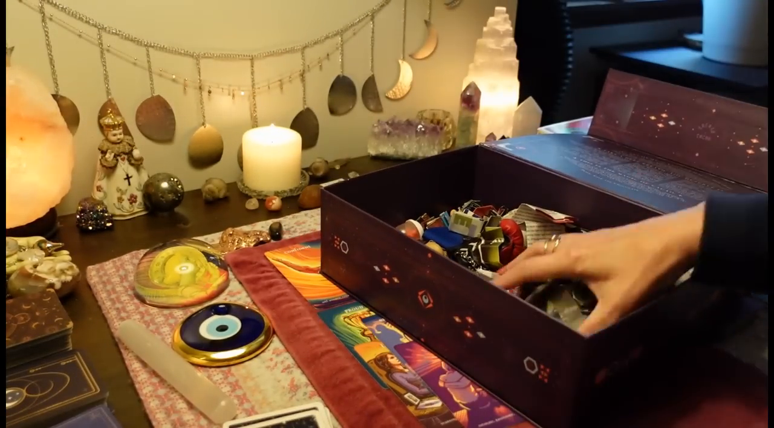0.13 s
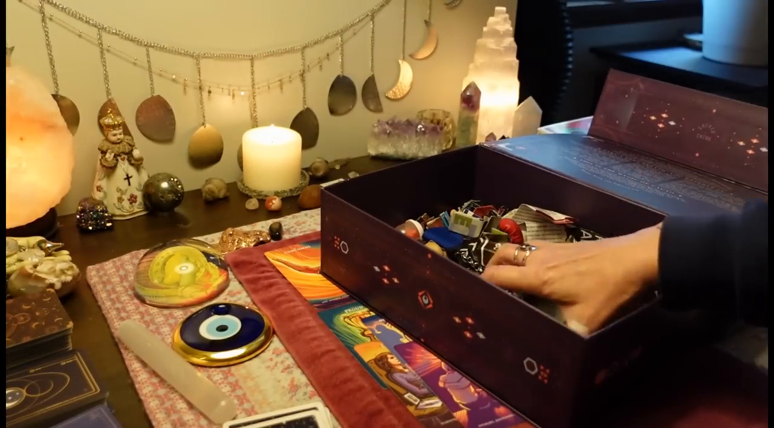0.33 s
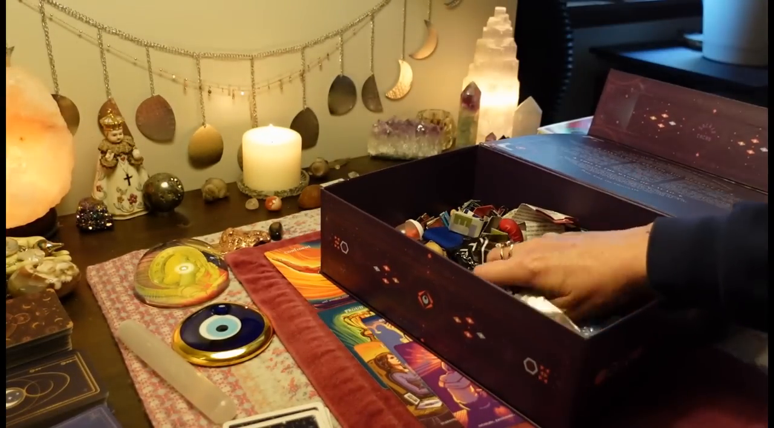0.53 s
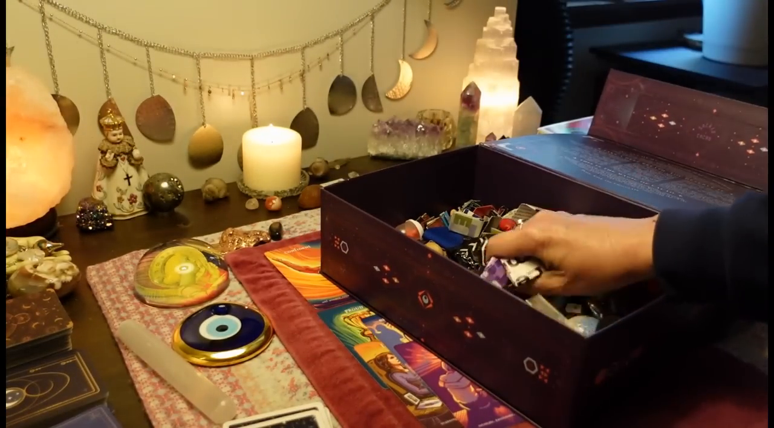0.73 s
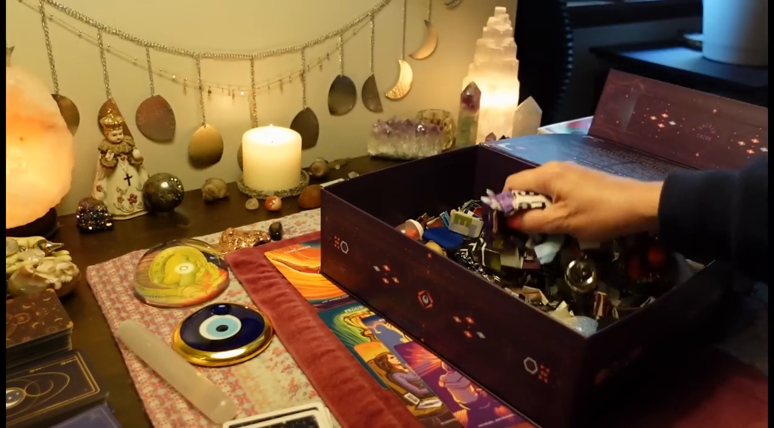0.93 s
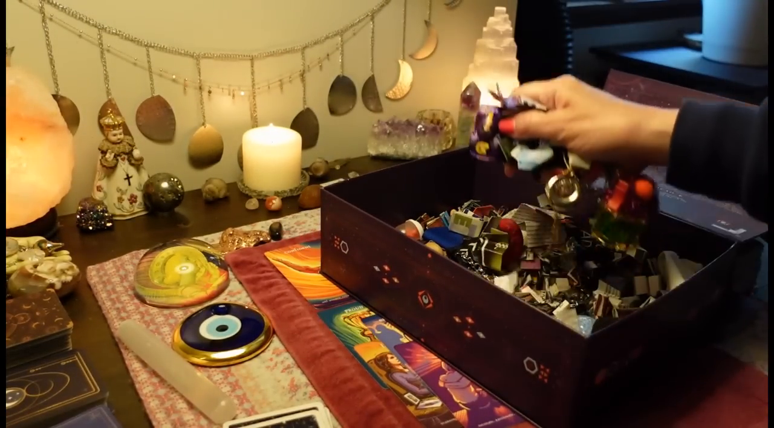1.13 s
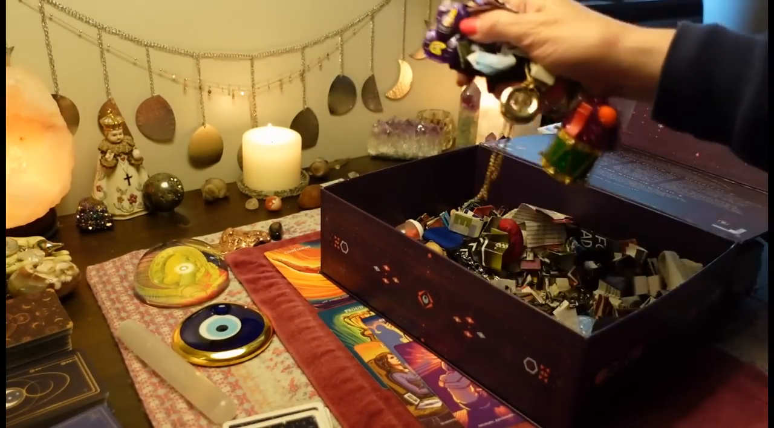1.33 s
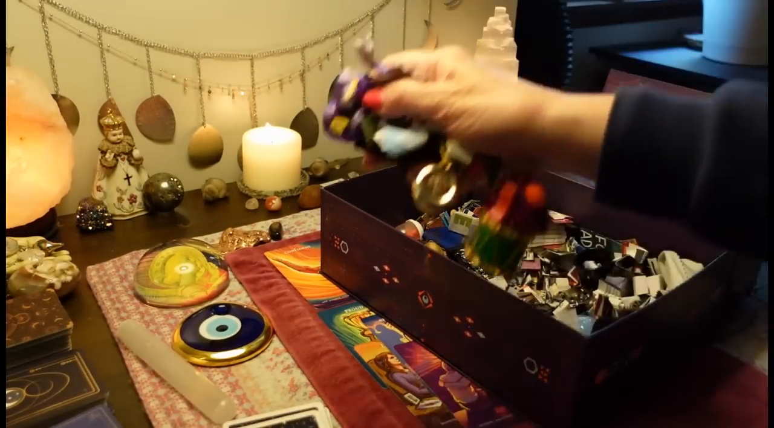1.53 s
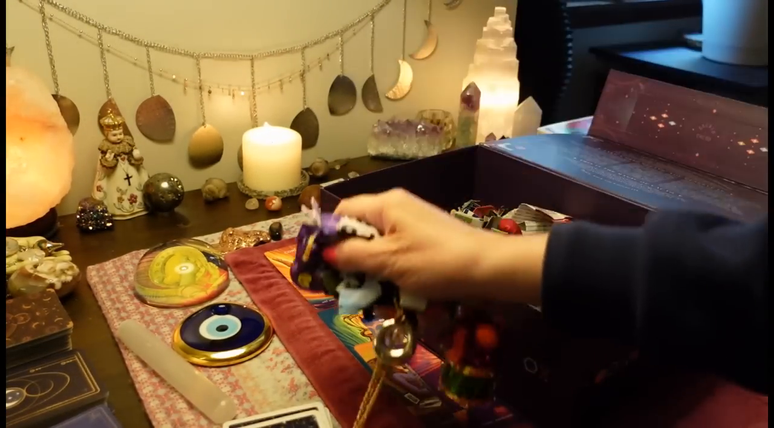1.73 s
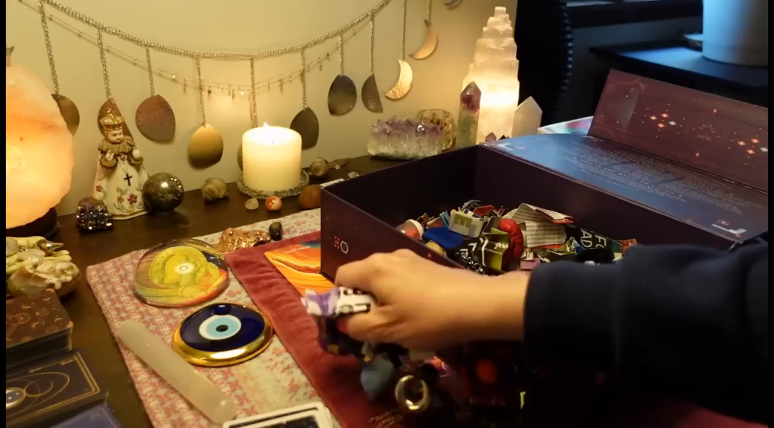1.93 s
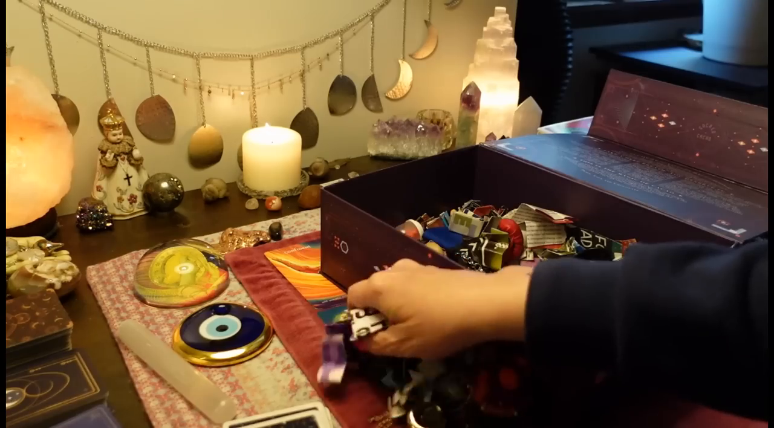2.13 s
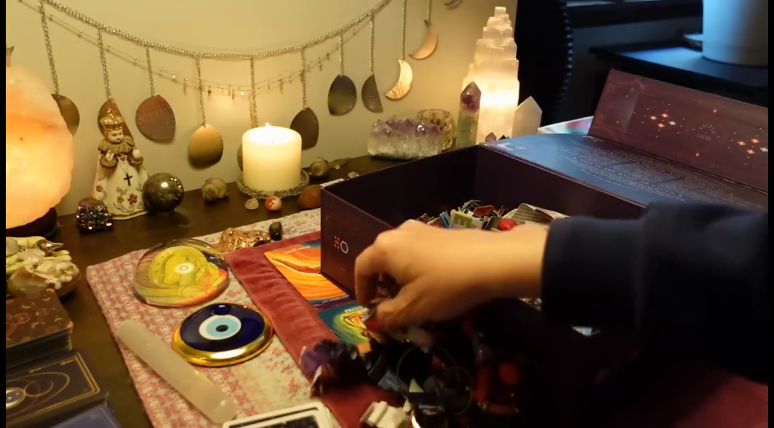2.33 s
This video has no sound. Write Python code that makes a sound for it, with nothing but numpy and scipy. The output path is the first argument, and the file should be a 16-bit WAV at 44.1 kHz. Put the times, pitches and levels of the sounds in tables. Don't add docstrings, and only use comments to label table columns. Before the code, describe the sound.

Dense clinking and rattling of small charms with dull box knocks, thinning to faint ticks as a fistful is lifted, then clacks on a cloth-covered table and one loud heavy crack, heard close indoors.

```python
import sys
import numpy as np
from scipy import signal
from scipy.fft import rfft, irfft, next_fast_len
from scipy.io import wavfile
from scipy.ndimage import uniform_filter1d

SR = 44100
rng = np.random.default_rng(int(sys.argv[2]) if len(sys.argv) > 2 else 0)


def boost_factor(decibels):
    exponent = np.asarray(decibels, float) / 20
    return 10 ** exponent


def pcm_store(signal):
    levels = np.round(np.clip(np.atleast_2d(signal), -1, 1) * 32767)
    wavfile.write(sys.argv[1], SR, levels.astype(np.int16).T)


N = 105310


def evened(x):
    return x / np.sqrt(np.mean(x ** 2) + 1e-20)


def read(points, hz):
    point_hz, value = np.transpose(points)
    return np.interp(np.log(hz + 1), np.log(point_hz + 1), value)


def shaped(x, points):
    hz = np.fft.rfftfreq(N, 1 / SR)
    return irfft(rfft(x) * boost_factor(read(points, hz)), N)


def add(mix, start_s, sound):
    part = mix[round(start_s * SR):][:len(sound)]
    part += sound[:len(part)]


def resonate(x, hz, width_hz):
    q = max(hz / width_hz, .3)
    return signal.lfilter(*signal.iirpeak(min(hz, .45 * SR), q, SR), x)


def ring(modes, soft_s=0.0017):
    t = np.arange(4000) / SR
    onset = 1 - np.exp(-t / soft_s)
    return onset * sum(boost_factor(db - 60 * t / t60) * np.sin(2 * np.pi * hz * t) for hz, db, t60 in modes)


def contacts(per_s, spread_db, clump_db, clump_s):
    width = int(clump_s * SR)
    clump = evened(uniform_filter1d(uniform_filter1d(rng.standard_normal(N), width), width))
    size = boost_factor(spread_db * np.minimum(rng.exponential(1, N), 4) + clump_db * clump)
    return size * rng.choice([-1., 1.], N) * (rng.random(N) < per_s / SR)


def stir(order):
    # start_s [s], rattle_db [dB], wall_push_db [dB]
    stirring = [(0.148, -67.5, -58), (0.175, -44.5, -46), (0.222, -44, -50.5), (0.264, -35.5, -37.5),
                (0.311, -34, -43.5), (0.369, -44.5, -50), (0.454, -28.5, -31.5), (0.534, -38.5, -43.5),
                (.65, -42, -47.5), (0.761, -50, -49.5), (.86, -48.5, -61), (.94, -54, -63.5),
                (1.05, -49, -65), (1.15, -64, -78), (1.92, -93, -79), (1.988, -51, -59), (2.132, -41, -50),
                (2.24, -52.5, -60)]
    rows = np.array(stirring)
    return boost_factor(np.interp(np.arange(N) / SR, rows[:, 0], rows[:, order], left=-90))


def hush():
    # hz [Hz], level_db [dB per Hz]
    spectrum = [(18, -59), (30, -25), (248, -9), (349, -9), (378, -13.5), (576, -11), (834, -14),
                (13700, -32.5), (16400, -30.5)]
    same = 0.48
    a, b = rng.standard_normal((2, N))
    pair = np.array([a, same * a + np.sqrt(1 - same ** 2) * b])
    return boost_factor(-60.5) * evened(shaped(pair, spectrum))


def room(x):
    # hz [Hz], t60_s [s]
    decay = [(200, 0.43), (1000, 0.47), (5000, 0.39), (15000, 0.18)]
    taps = np.zeros((3, SR // 2))
    at = np.arange(120, SR // 2 - 20, 20) + rng.integers(0, 20, (3, (SR // 2 - 121) // 20))
    np.put_along_axis(taps, at, rng.choice([-1., 1.], at.shape), 1)
    hz, t, z = signal.stft(taps[0] + 0.6 * taps[1:], SR, nperseg=256)
    tail = signal.istft(z * boost_factor(-60 * t / read(decay, hz)[:, None]), SR, nperseg=256)[1]
    return signal.fftconvolve(x[None], tail / np.linalg.norm(tail[0]), axes=1)[:, :N]


def thumps():
    # start_s [s], level_db [dB], pitch_hz [Hz]
    flexings = [
        (0.425, -34, 163),
        (.462, -31, 287),
        (0.539, -35.5, 136),
        (0.637, -41.5, 166),
        (0.714, -45, 150),
        (.735, -40.5, 278),
        (.72, -43, 414),
        (0.8, -42.5, 165),
        (2.124, -38.5, 181),
    ]
    out = np.zeros(N)
    for start_s, level_db, pitch_hz in flexings:
        add(out, start_s, boost_factor(level_db) * ring([(pitch_hz, 3, 0.097)], soft_s=0.0046))
    return out


def walls():
    # pitch_hz [Hz], width_hz [Hz], level_db [dB]
    panels = [(144.4, 53, -3), (189, 44, 0.5), (260.6, 18, 3), (398, 64, 6), (529, 101, 2.5), (772, 100, 2),
              (1220, 127, -7)]
    push = evened(contacts(1500, 2.85, 1.8, 0.002)) * stir(order=2)
    out = np.zeros(N)
    for k, (hz, width_hz, db) in enumerate(panels):
        out += (-1) ** k * boost_factor(db) * resonate(push, hz, width_hz)
    return boost_factor(16.5) * out


def knock(level_db, slap_db):
    # pitch_hz [Hz], level_db [dB], t60_s [s]
    hollow = [(541, 4.5, 0.045), (470, -10, 0.02), (628, -2, 0.024), (300, -15.5, 0.026),
              (163.3, -23.5, 0.049)]
    modes = [(hz * (1 + 0.053 * rng.uniform(-1.02, 1)), db, t60) for hz, db, t60 in hollow]
    slap = ring([(950, slap_db, .009)])
    return boost_factor(level_db) * (ring(modes, soft_s=0.0024) + boost_factor(15.5) * slap)


def knocks():
    # start_s [s], level_db [dB], slap_db [dB]
    blows = [(0.177, -32.5, -6), (0.247, -29.5, -9), (0.28, -27, 0), (0.325, -23.5, -7), (0.39, -27, -5),
             (0.425, -28, -4), (0.468, -34, 3), (0.481, -22.5, -9), (0.552, -28, -5), (0.631, -39, 3),
             (0.718, -31, -26), (0.733, -46, -37), (0.819, -39.5, -5), (1.9288, -30.5, -7),
             (1.979, -24.5, -8), (2.097, -48, 23), (2.124, -21.5, -7.5)]
    out = np.zeros(N)
    for start_s, level_db, slap_db in blows:
        add(out, start_s, knock(level_db, slap_db))
    return out


def rattle():
    # hz [Hz], level_db [dB per Hz]
    spectrum = [(410, -18.5), (700, -5), (1740, -9), (2300, -8.5), (8280, -7.5), (15000, -15), (15800, -6),
                (16400, -59)]
    hits, piece = contacts(5000, 3.0, 1.9, 0.0072), rng.integers(0, 10, N)
    ticks = 0.33 * hits
    for k, hz in enumerate(np.geomspace(1300, 14000, num=10)):
        ticks += resonate(hits * (piece == k), hz, 0.29 * hz) * np.sqrt(5000 / hz)
    dry_ticks = evened(shaped(ticks, [(200, -27)] + list(spectrum)))

    pitches_hz = np.geomspace(2100, 14800, num=28) * rng.uniform(.96, 1.04, size=28)
    few, which = contacts(1200, 1.4, 4.9, 0.022), rng.integers(0, len(pitches_hz), N)
    gain = stir(order=1)
    rung = np.zeros(N)
    for k, hz in enumerate(pitches_hz):
        rung += signal.oaconvolve(few * gain * (which == k), ring([(hz, 0, .022)]))[:N]
    return dry_ticks * gain + boost_factor(-8) * rung


def pendant():
    # pitch_hz [Hz], level_db [dB], t60_s [s]
    modes = [(840, -14, 0.023), (2380, -11.5, 0.016), (6230, -17, .015), (7430, -7, 0.019),
             (7920, -12, 0.029), (8300, -6, 0.035), (8230, -9.5, 0.034), (8680, -12, .02),
             (9100, -9, 0.018), (9800, -8.5, 0.017), (11100, -12, 0.014), (13500, -2, 0.0055),
             (14400, -5, .005)]
    # start_s [s], level_db [dB]
    swings = [(1.033, -43), (1.043, -35), (1.0463, -41), (1.0485, -36), (1.0502, -35), (1.055, -51),
              (1.0589, -35), (1.062, -42), (1.0655, -36), (1.0688, -33), (1.0721, -39.5), (1.075, -51),
              (1.08, -51), (1.1223, -49), (1.1255, -47)]
    out = np.zeros(N)
    for start_s, level_db in swings:
        spot = [(hz * (1 + 0.021 * rng.standard_normal()), db + 5.1 * rng.standard_normal(), t60)
                for hz, db, t60 in modes]
        add(out, start_s, boost_factor(level_db) * ring(spot, soft_s=.00005))
    return out


def clack(level_db, pitch_hz, chatter_s, ring_db, first, width_hz):
    sign, chance, ratio = rng.standard_normal(2000), rng.random(2000), rng.uniform(1.2, 1.87)
    u = np.arange(2000) / SR / max(chatter_s, .0003)
    hits = sign * (chance < .3) * np.minimum(u / 0.39, 1) * np.exp(-u)
    hits[0] = first
    middle_hz = pitch_hz ** .6 * 4500 ** 0.4
    broad = resonate(resonate(hits, middle_hz, 2.06 * middle_hz), middle_hz, 2.06 * middle_hz)
    tick = broad + boost_factor(-12.5) * np.diff(hits, prepend=0)
    overtone = resonate(hits, pitch_hz * ratio, 2 * width_hz)
    rung = resonate(hits, pitch_hz, width_hz) + boost_factor(-37.0) * overtone
    sound = tick + boost_factor(ring_db) * rung
    return boost_factor(level_db) * sound / abs(sound).max()


def clacks():
    # start_s [s], level_db [dB], pitch_hz [Hz], chatter_s [s]
    dig = [(0.0423, -49, 1320, 0.016), (0.1671, -33, 2260, 0.008), (0.179, -26.5, 4600, 0.0073),
           (0.2383, -32, 3130, 0.006), (.2463, -19, 7850, 0.0024), (0.2505, -16.5, 7960, 0.0063),
           (0.2535, -27, 6000, 0.0064), (0.2787, -15.5, 5300, 0.0072), (0.2902, -16, 1250, 0.0074),
           (0.3037, -25, 8850, 0.005), (0.4285, -22, 2500, 0.007), (0.45, -15.5, 3100, 0.0033),
           (0.4655, -32, 2200, 0.018), (0.5526, -18, 1320, 0.0015), (0.612, -24, 8400, 0.0058),
           (0.6298, -21.5, 8570, 0.0081), (0.6468, -17.5, 5500, 0.005), (0.6813, -28, 3540, 0.017),
           (.778, -28, 2330, 0.0023), (0.7816, -21, 6540, 0.0034), (.783, -30, 15100, 0.0024),
           (0.9747, -40, 2400, 0.0058)]
    chimes = [(0.3879, -20, 2320, 0.0057), (0.4029, -18, 2370, 0.0044), (0.4168, -17, 2340, 0.0054),
              (0.8781, -33.5, 2220, 0.0031), (0.9956, -36, 2360, 0.0041), (1.0114, -36, 2410, 0.0041),
              (.06, -43.5, 12000, .003), (.287, -19.5, 8420, .003), (.441, -18, 4430, 0.0046),
              (.456, -25, 8300, 0.0035), (.664, -40, 9300, .003), (.687, -31.5, 9500, 0.0038),
              (.632, -29.5, 4080, 0.0033), (.885, -35, 8600, .002), (1.004, -31.5, 14300, .004),
              (1.018, -39, 11700, .004)]
    lift = [
        (1.303, -47, 7000, .002),
        (1.325, -43, 11000, 0.008),
        (1.3436, -41, 13000, 0.011),
        (1.356, -45, 10900, 0.0046),
        (1.3885, -37.5, 1850, 0.0076),
        (1.7752, -24, 11560, 0.0079),
        (1.8008, -38, 12500, 0.015),
    ]
    drop = [(1.929, -34, 1700, 0.0077), (1.9495, -35.5, 6700, 0.0017), (1.955, -30.5, 8350, 0.0038),
            (1.962, -38, 5030, 0.0022), (1.9697, -29, 2730, 0.0066), (1.9914, -29, 1630, 0.0032),
            (2.0153, -26.5, 3630, 0.0048), (2.0323, -19.5, 4070, 0.0056), (2.0492, -32, 3900, 0.0063),
            (2.0564, -21, 3730, 0.0013), (2.0981, -14.5, 2700, 0.0042), (2.1124, -20, 2960, 0.0082),
            (2.1234, -17.5, 5400, 0.0078), (2.1415, -19, 3970, 0.0043), (2.1644, -32, 2310, 0.0035),
            (2.1685, -15.5, 4400, 0.0027), (2.1791, -20, 4080, 0.0038), (2.2478, -29.5, 2250, 0.0042)]
    snaps = [(.076, -44.5, 1550, 0.017), (.372, -17, 1060, 0.0072), (0.573, -36, 6000, 0.0028),
             (0.5887, -20, 2520, 0.0015), (.59, -16.5, 7500, 0.002), (0.802, -27, 8400, 0.0054),
             (0.819, -30.5, 3000, 0.0038), (0.8463, -24.5, 6300, 0.0027), (0.846, -30, 2290, 0.0051),
             (0.846, -23, 14600, 0.0023), (0.862, -35, 14100, 0.0024), (1.6697, -46, 5050, 0.0011),
             (2.198, -29, 7060, .001), (2.204, -25, 8450, 0.0011), (2.273, -31, 1800, 0.0022),
             (2.2598, -27.5, 6500, 0.0068), (2.346, -21.5, 5900, 0.0049)]
    out = np.zeros(N)
    for rows, *kind in ((dig, 6, 2.2, 250), (chimes, 17, 3, 160), (lift, 3, 3.5, 250),
                        (drop, 6, 2.2, 500), (snaps, 5, 2.8, 400)):
        for start_s, *piece in rows:
            add(out, start_s, clack(*piece, *kind))
    return out


def slam():
    # pitch_hz [Hz], level_db [dB], t60_s [s]
    tap = [(900, -5.5, 0.0046), (1270, -12, 0.0055), (2090, -18, .014), (3720, -13, 0.0042),
           (5400, -18, 0.005), (7240, -20, 0.0045)]
    crack = [(1200, -8, 0.0045), (1790, -6, 0.006), (2580, -6.5, 0.0039), (3900, -14.5, .004),
             (5960, -26, 0.004), (8100, -29, 0.0094)]
    table = [(567, -8, 0.054), (832, -10.5, 0.024), (965, -35, 0.058), (1487, -11.5, 0.032),
             (1935, -10, 0.016), (2210, -40, .04), (2870, -29, 0.12), (3680, -20.5, 0.02),
             (4500, -49, 0.025)]
    # start_s [s], level_db [dB]
    taps = [
        (2.338, -5),
        (2.3515, -27),
        (2.3597, -16),
        (2.3619, -7.5),
    ]
    # start_s [s], level_db [dB]
    blows = [
        (2.3657, -1.5),
        (2.3668, -7),
        (2.3689, 0),
        (2.37, -11),
        (2.3815, -26),
        (2.3855, -16),
    ]
    out = np.zeros(N)
    for start_s, level_db in taps:
        add(out, start_s, -boost_factor(level_db) * ring(tap, soft_s=.0001))
    for start_s, level_db in blows:
        add(out, start_s, -boost_factor(level_db) * ring(crack, soft_s=.0001))
    add(out, blows[1][0], ring(table, soft_s=0.0006))
    return signal.sosfilt(signal.butter(6, 430, "high", fs=SR, output="sos"), out)


def scene():
    near = thumps() + walls() + knocks() + rattle() + pendant() + clacks() + slam()
    quadrature = signal.hilbert(near, next_fast_len(N))[:N].imag
    side = boost_factor(-18) * quadrature + resonate(near, 180, 560) * 0.065 + np.gradient(near) * 0.03
    return near + np.array([side, -side]) + boost_factor(-11) * room(near) + hush()


def roll_off(x):
    return signal.sosfilt(signal.butter(12, 15900, fs=SR, output="sos"), x)


def record(dry):
    band = signal.butter(3, [70, 17500], "band", fs=SR, output="sos")
    return roll_off(signal.sosfilt(band, dry))


dry = scene()
out = record(dry)
pcm_store(out)
```